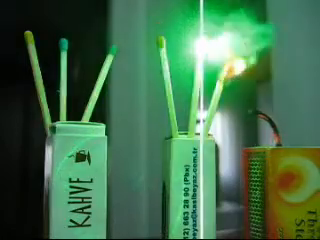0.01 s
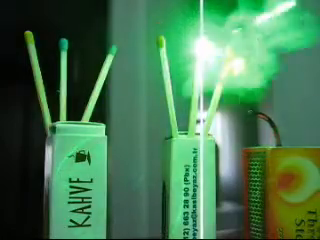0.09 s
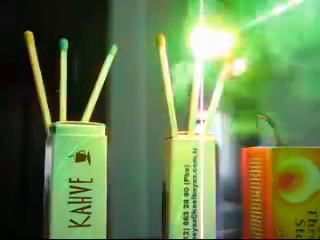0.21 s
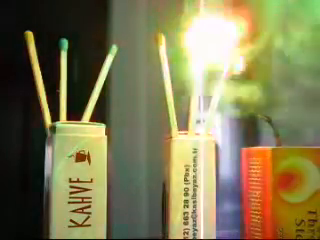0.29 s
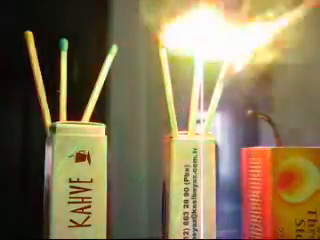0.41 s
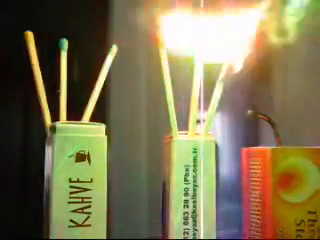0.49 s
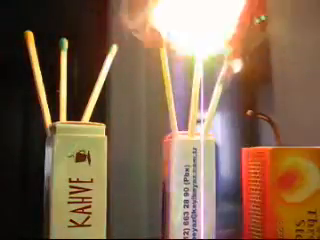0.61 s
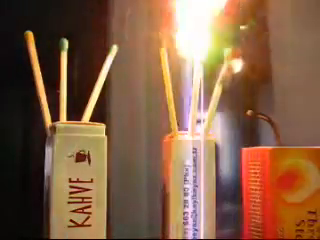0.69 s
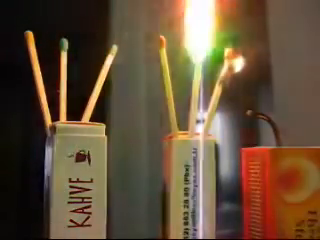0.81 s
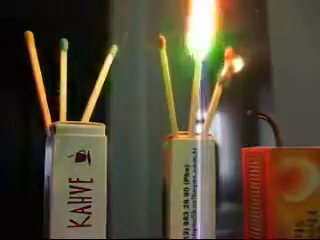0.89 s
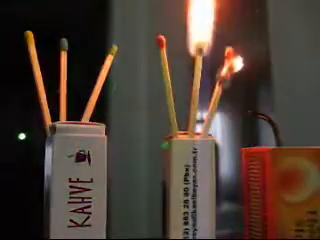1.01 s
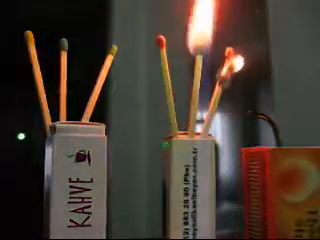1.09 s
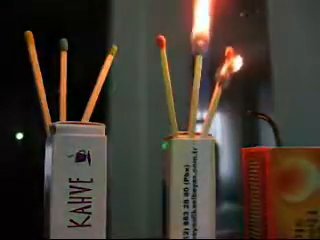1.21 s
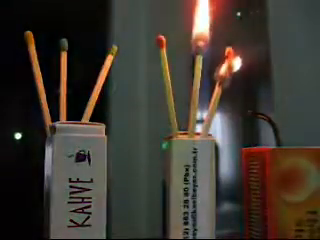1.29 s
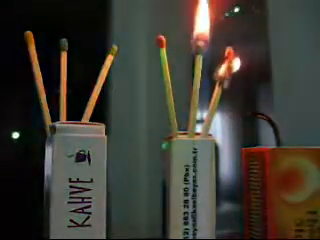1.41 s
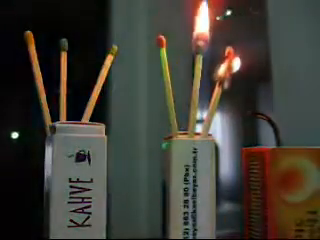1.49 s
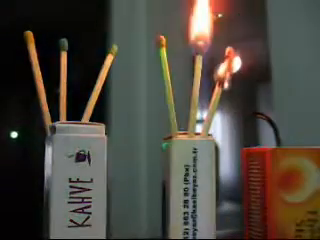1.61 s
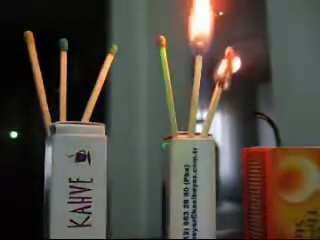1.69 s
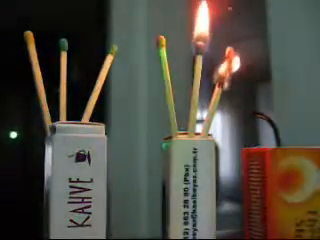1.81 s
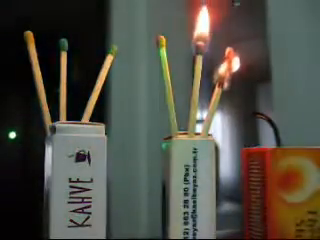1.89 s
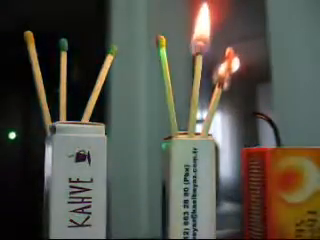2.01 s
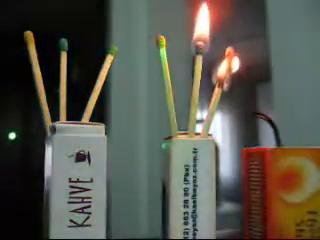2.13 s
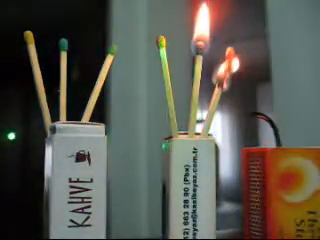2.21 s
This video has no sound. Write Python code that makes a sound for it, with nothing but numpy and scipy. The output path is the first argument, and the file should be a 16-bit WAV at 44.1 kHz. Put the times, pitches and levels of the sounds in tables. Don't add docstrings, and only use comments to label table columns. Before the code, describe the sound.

A match head ignites with a sharp pop and flares in a crackling hiss, then softly ticks.

```python
import sys
import numpy as np
from scipy import signal
from scipy.fft import rfft, irfft, next_fast_len
from scipy.io import wavfile
from scipy.ndimage import uniform_filter1d, map_coordinates

SR = 44100
rng = np.random.default_rng(int(sys.argv[2]) if len(sys.argv) > 2 else 0)


def bounce(signal):
    frames = np.transpose(np.atleast_2d(signal))
    limited = np.clip(frames, -1, 1)
    pcm = np.round(limited * 32767).astype(np.int16)
    wavfile.write(sys.argv[1], SR, pcm)


def voltage_ratio(decibels):
    exponent = np.asarray(decibels, float) / 20
    return 10 ** exponent


N = 101430


def unit(x):
    return x / np.sqrt(np.mean(x ** 2) + 1e-20)


def along(points, hz):
    f, v = np.transpose(points)
    return np.interp(np.log(hz + 1), np.log(f + 1), v)


def curve(rows):
    return np.interp(np.arange(N) / SR, *np.transpose(rows))


def wobble(rate_hz):
    return map_coordinates(rng.standard_normal(400), [np.arange(N) * rate_hz / SR])


def filtered(x, response):
    m = next_fast_len(N + 8192)
    return irfft(rfft(x, m) * response(np.fft.rfftfreq(m, 1 / SR)), m)[..., :N]


def add_ring(track, start_s, db, hz, t60_s):
    t = np.arange(SR // 20) / SR
    track[round(start_s * SR):][:len(t)] -= voltage_ratio(db - 60 * t / t60_s) * np.sin(2 * np.pi * hz * t)


def room_air():
    # (frequency [Hz], density [dB per Hz])
    room = [(30, -27.5), (60, -12.5), (145, -12.5), (260, -13.5), (500, -20.5), (1900, -26.5),
            (3200, -26.5), (5500, -22.5)]
    noise = rng.standard_normal(N)
    return voltage_ratio(-36.5) * unit(filtered(noise, lambda f: voltage_ratio(along(room, np.minimum(f, 9000)))))


def camera_motor():
    # (frequency [Hz], level [dB rms])
    hum_tones = [(196.3, -43), (392.7, -55.5)]
    whine_hz = [2774.5, 3176.5, 2454]
    # (level [dB rms], constant lowering of pitch between phase jumps [Hz])
    whine_tones = [(-53.5, 11.5), (-64, 15), (-70, 3)]
    restarts_per_s, hum_wobble_db = 30, 0.52
    t = np.arange(N) / SR
    hum = sum(voltage_ratio(db + 3.5) * np.sin(2 * np.pi * (hz * t + rng.random())) for hz, db in hum_tones)
    since_restart = t % (1 / restarts_per_s)
    whine = np.zeros(N)
    for hz, (db, lowering_hz) in zip(whine_hz, whine_tones):
        whine += voltage_ratio(db + 6) * np.sin(2 * np.pi * (hz * t - lowering_hz * since_restart))
    return voltage_ratio(hum_wobble_db * wobble(12)) * hum + whine


def draught():
    # (time [s], level [dB])
    strength = [(0.0, -58.5), (0.3, -43), (0.38, -32), (0.63, -35.5), (0.68, -32), (0.76, -29.5),
                (0.88, -35), (0.9, -34.5), (0.95, -45), (1.29, -38), (1.31, -44.5), (1.66, -43.5),
                (1.7, -38), (1.97, -46.5), (2.09, -41), (2.3, -46)]
    # (frequency [Hz], density [dB per Hz])
    flutter = [(10, -17.5), (30, -2), (60, -7), (110, -12), (170, -28), (400, -86.5)]
    noise = rng.standard_normal(N)
    return voltage_ratio(curve(strength)) * unit(filtered(noise, lambda f: voltage_ratio(along(flutter, f))))


def wood_knocks():
    # (time [s], peak [dB], pitch [Hz])
    knocks = [(.8605, -18.5, 493), (0.937, -27, 900), (1.011, -34, 380), (1.0736, -18.5, 546),
              (1.363, -27.5, 500), (1.428, -33, 600), (1.771, -35.5, 600), (1.911, -28.5, 584),
              (2.1315, -23.5, 500), (2.28, -30.5, 627)]
    ring_cycles, tick_db, puff_db, puff_t60_s = 2.3, -5, -11.5, 0.028
    x = np.zeros(N + SR)
    puff_t = np.arange(441) / SR
    for s, db, hz in knocks:
        add_ring(x, s, db + 0.5, hz, 2 * ring_cycles / hz)
        add_ring(x, s, db + tick_db, 1.7 * hz, .006)
        puff = voltage_ratio(db + puff_db - 60 * puff_t / puff_t60_s) * rng.standard_normal(len(puff_t))
        x[round(s * SR):][:len(puff)] += puff
    return x[:N]


def spark_snaps():
    # (time [s], peak [dB], pitch [Hz])
    snaps = [(.2232, -16, 2500), (.3201, -13, 2200), (.348, -16, 2400), (.378, -10, 4800),
             (.38505, -2, 4600), (.4182, -13, 3500), (.465, -12, 4000), (.4927, -15, 3000),
             (.4975, -11, 4500), (.5466, -11, 3500), (.5835, -14, 3000), (.6434, -7, 4200),
             (.68, -13, 3800), (.709, -19, 2000), (.728, -15, 3500), (.841, -15, 3500), (.847, -18, 3500),
             (.8737, -12, 3000), (.8846, -13, 3000), (.955, -34, 2500), (1.9607, -20, 3700)]
    width_cycles, tail_db, snap_db = .5, -12, 6
    x, t = np.zeros(N + SR), np.arange(N + SR) / SR
    for s, db, hz in snaps:
        cycles = (t - s) * hz
        bell = np.exp(-np.clip(cycles / width_cycles, -9, 9) ** 2)
        x -= voltage_ratio(db + snap_db) * bell * np.sin(2 * np.pi * cycles)
        add_ring(x, s + .5 / hz, db + tail_db, 2500, .008)
    return x[:N]


def ignition_pop():
    # (frequency [Hz], level [dB], t60 [s])
    pull_rings = [(530, -36, 0.018), (2380, -2, 0.0076)]
    # (frequency [Hz], level [dB], t60 [s])
    push_rings = [(1985, -3.5, 0.0043), (500, -29.5, 0.048), (4560, -2.5, 0.0054), (3240, 0.5, 0.0087)]
    pop_s, pop_db, pull_s, push_s = .2138, -1, .00062, .0005
    t = np.arange(N + SR) / SR - pop_s
    pull = -.6 * (t > 0)
    push = np.exp(-np.abs(t - pull_s) / push_s)
    x = voltage_ratio(pop_db) * np.where(t < pull_s, pull, push)
    for hz, db, t60_s in pull_rings:
        add_ring(x, pop_s, pop_db + db, hz, t60_s)
    for hz, db, t60_s in push_rings:
        add_ring(x, pop_s + pull_s, pop_db + db, -hz, t60_s)
    return x[:N]


def flare():
    # (time [s], hiss [dB])
    smoulder = [
        (.06, -72),
        (.066, -39.5),
        (.115, -31.5),
        (.14, -37.5),
        (.19, -31.5),
        (.209, -42),
        (.213, -19),
        (.216, -69),
    ]
    # (time [s], hiss [dB])
    burn = [
        (.212, -55),
        (.217, -22),
        (.385, -18.5),
        (.55, -20),
        (.645, -21),
        (.66, -23),
        (.89, -25),
        (.901, -39.5),
        (.99, -60.5),
    ]
    # (frequency [Hz], density [dB per Hz])
    hiss = [(60, -17.5), (150, -1.5), (500, -4.5), (1100, -8.5), (2000, -6), (3500, -3), (5200, -6.5)]
    # (centre [Hz], width [Hz], level [dB])
    hollow = [(498, 110, -0.5), (848, 120, 4), (1388, 360, 5.5), (2218, 430, -1), (3204, 240, -1),
              (4320, 690, -7.5), (5177, 470, 5)]
    crackles_per_s, spread_db, rarest, crackle_db = 900, 4, .04, -3
    gust_db, sputter_db = .6, .8

    def colour(f):
        box = 1
        for c, w, db in hollow:
            box = box + voltage_ratio(db) * 1j * f * w / (c * c - f * f + 1j * f * w)
        return voltage_ratio(along(hiss, f)) * box

    chance, size = rng.random((2, N))
    sizes = voltage_ratio(-spread_db * np.log(size + rarest))
    grains = (chance < crackles_per_s / SR) * sizes * np.sign(rng.standard_normal(N))
    crackles = grains - 0.69 * np.roll(grains, shift=4)
    jets = voltage_ratio(gust_db * wobble(25) + sputter_db * wobble(120)) * rng.standard_normal(N)
    mix = filtered(unit(jets) + voltage_ratio(crackle_db) * unit(crackles), colour)
    return (voltage_ratio(curve(smoulder)) + voltage_ratio(curve(burn))) * unit(mix)


def scene():
    background = room_air() + camera_motor()
    match = draught() + wood_knocks() + spark_snaps() + ignition_pop() + flare()
    return (background + match)[None]


def low_pass(x):
    return signal.sosfilt(signal.butter(12, 12880, fs=SR, output="sos"), x)


def record(dry):
    hold, steps, offset = 4, 128, 0.0013
    soft_top_hz, notch_hz, loud_db = 5693, (10750, 11330), -28
    edge_hz, edge_db = 12900, -28
    slow = filtered(dry, lambda f: 1 / (1 + 1j * f / soft_top_hz) ** 3)[:, 3::hold]
    coarse = np.round(np.clip(slow + offset, -1, 1) * steps) / steps
    held = np.pad(np.repeat(coarse, hold, axis=1), ((0, 0), (2, hold)), "edge")[:, :N]
    loud = uniform_filter1d(held ** 2, size=2048) > voltage_ratio(2 * loud_db)
    band = filtered(held, lambda f: (f > notch_hz[0]) & (f < notch_hz[1]))
    notched = held - uniform_filter1d(1. * loud, size=512) * band
    mix = filtered(notched, lambda f: np.where(f < edge_hz, 1, voltage_ratio(edge_db)))
    return low_pass(mix)


dry = scene()
out = record(dry)
bounce(out)
```